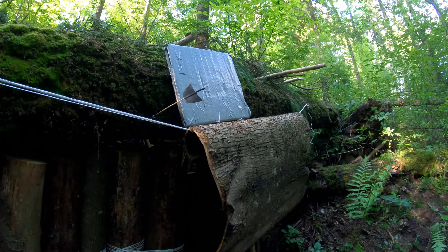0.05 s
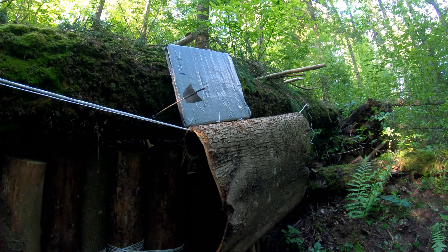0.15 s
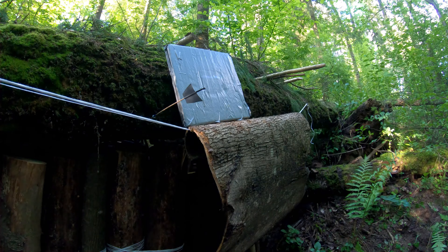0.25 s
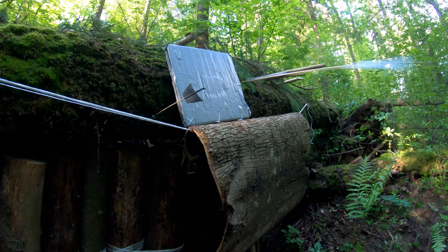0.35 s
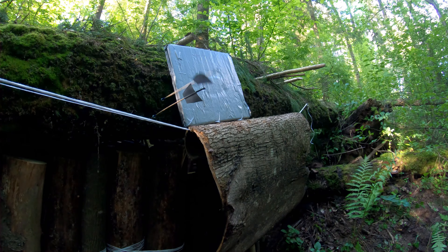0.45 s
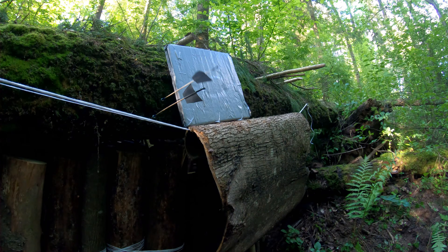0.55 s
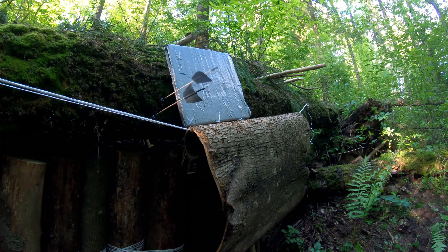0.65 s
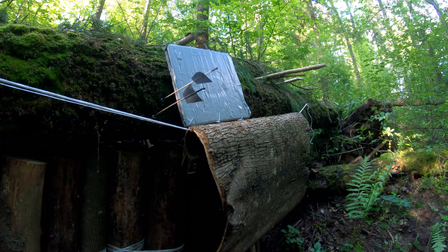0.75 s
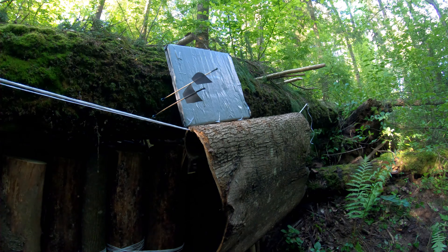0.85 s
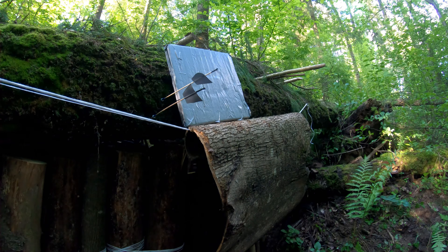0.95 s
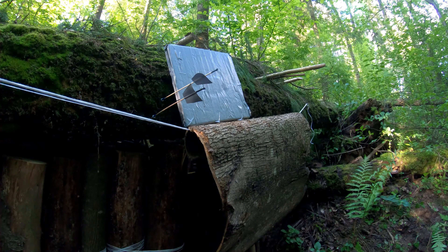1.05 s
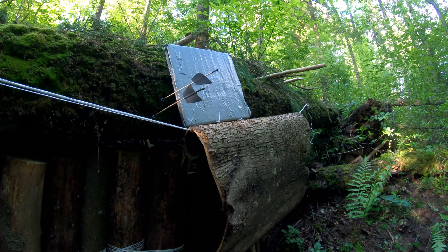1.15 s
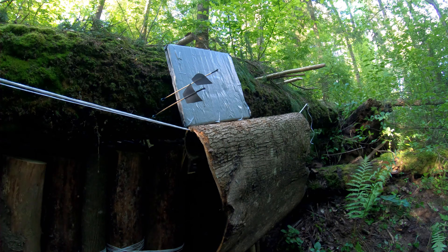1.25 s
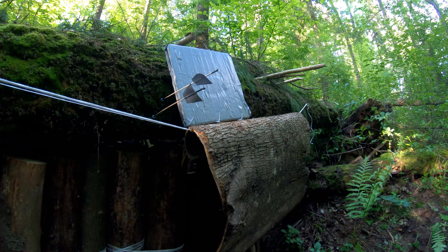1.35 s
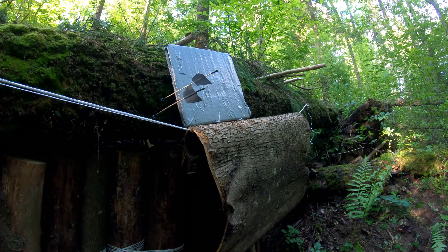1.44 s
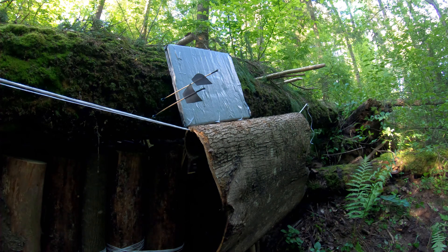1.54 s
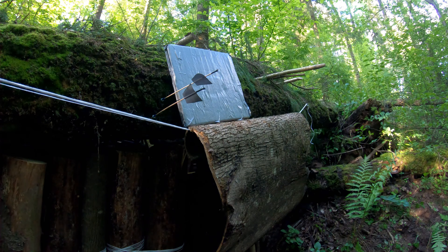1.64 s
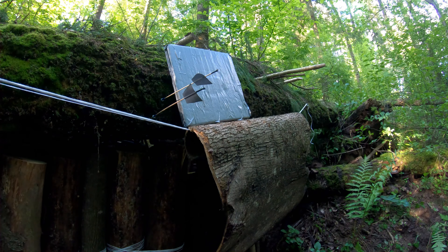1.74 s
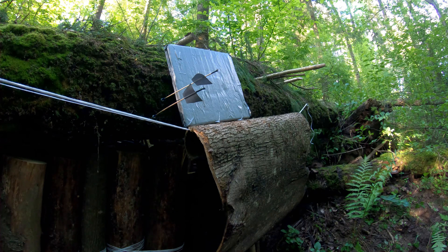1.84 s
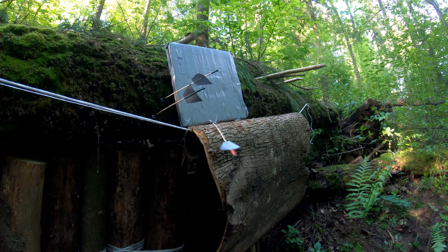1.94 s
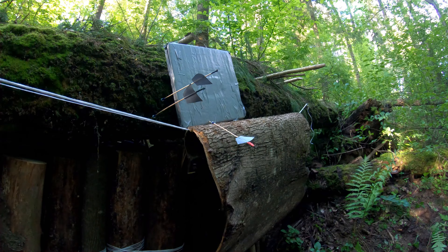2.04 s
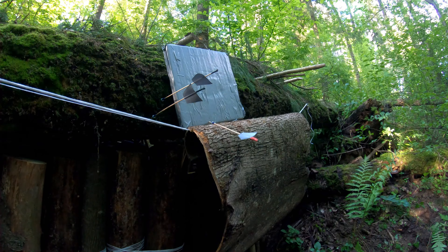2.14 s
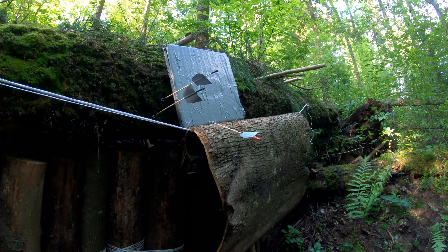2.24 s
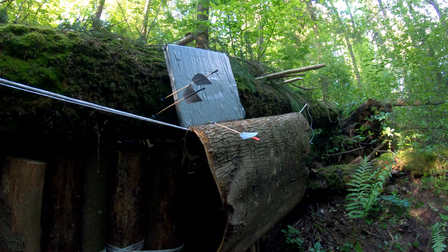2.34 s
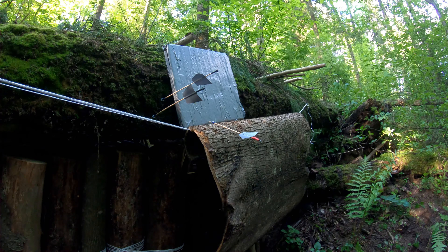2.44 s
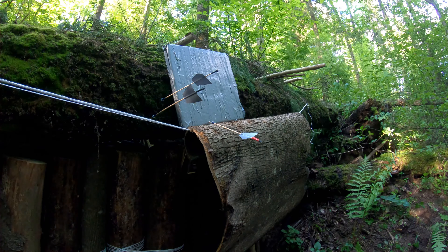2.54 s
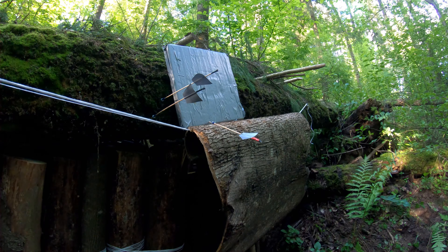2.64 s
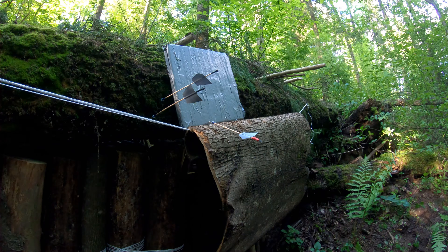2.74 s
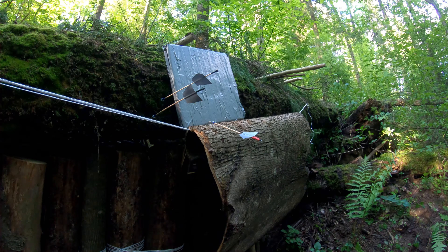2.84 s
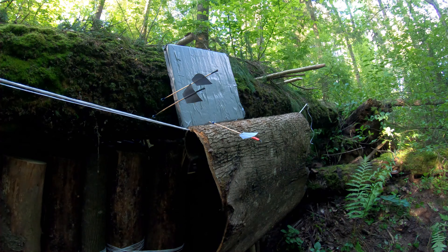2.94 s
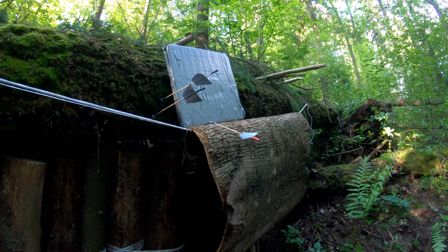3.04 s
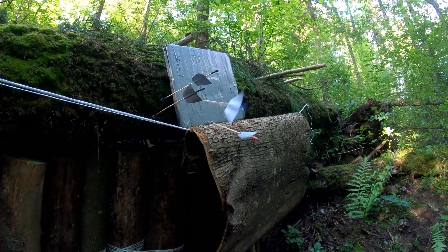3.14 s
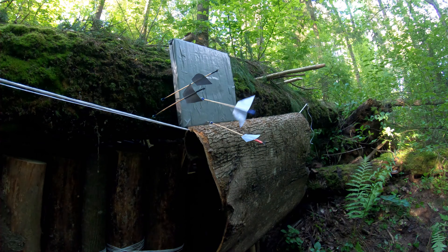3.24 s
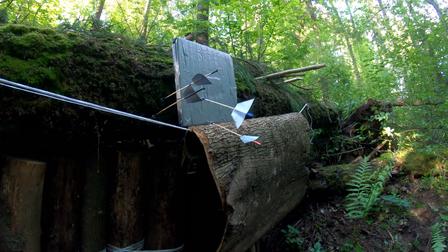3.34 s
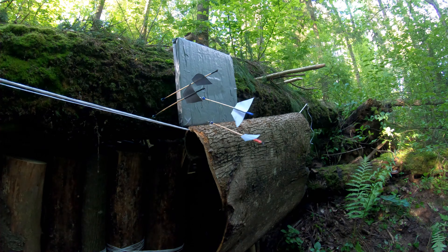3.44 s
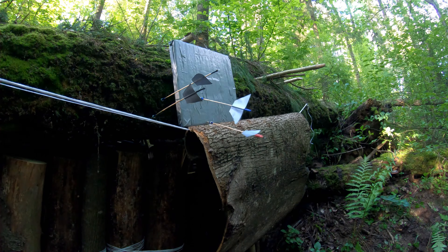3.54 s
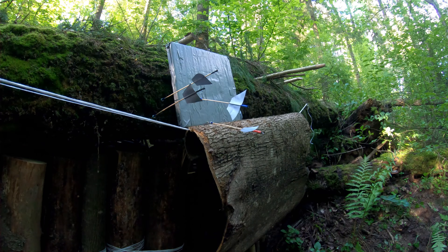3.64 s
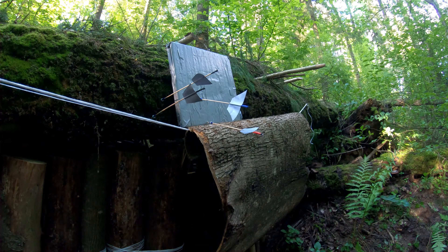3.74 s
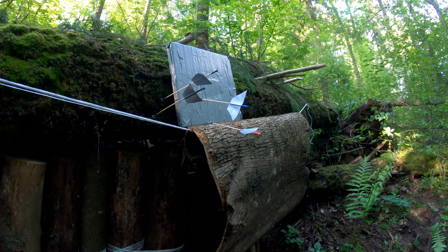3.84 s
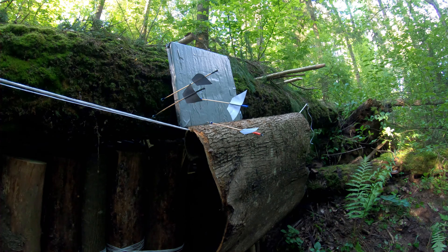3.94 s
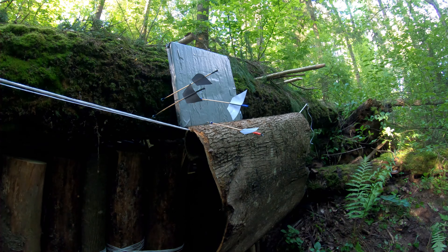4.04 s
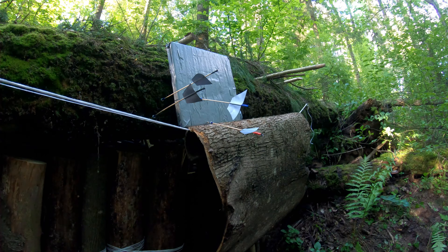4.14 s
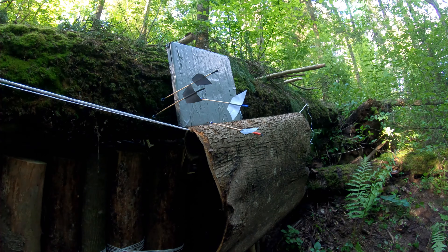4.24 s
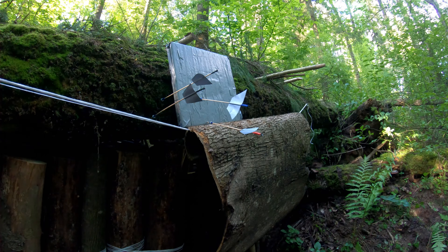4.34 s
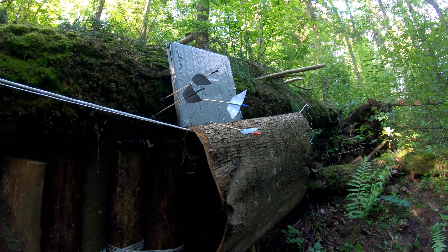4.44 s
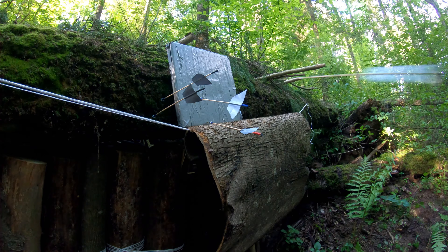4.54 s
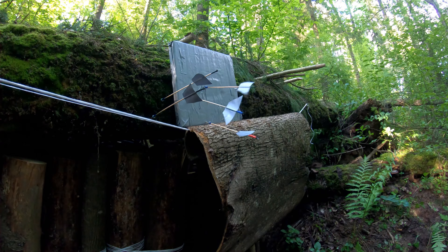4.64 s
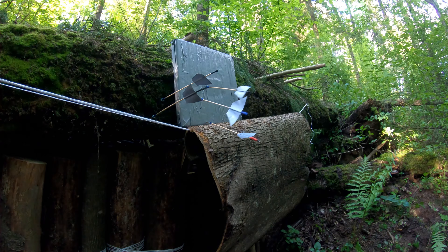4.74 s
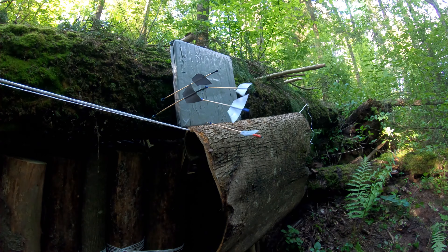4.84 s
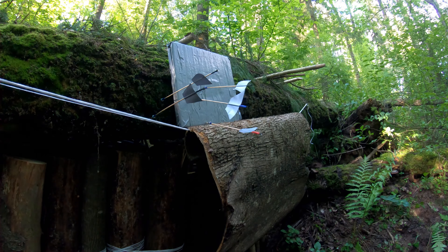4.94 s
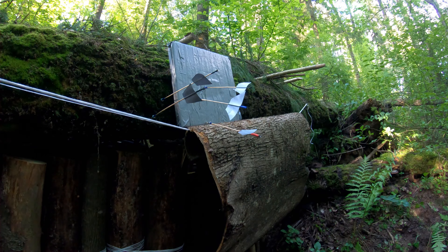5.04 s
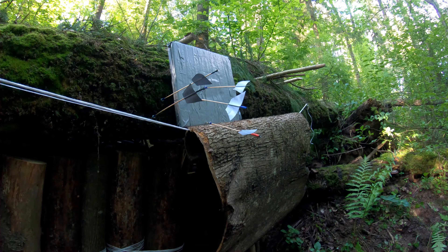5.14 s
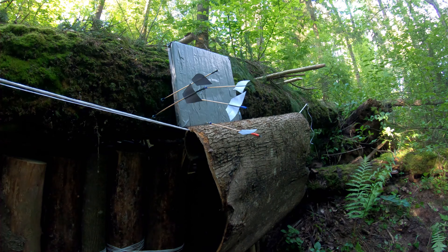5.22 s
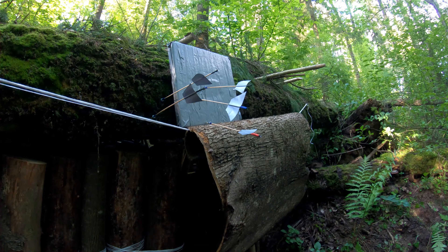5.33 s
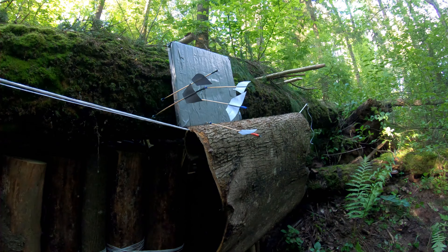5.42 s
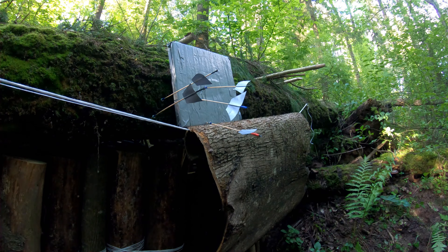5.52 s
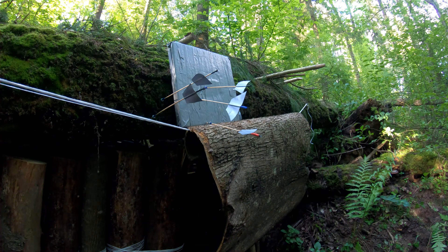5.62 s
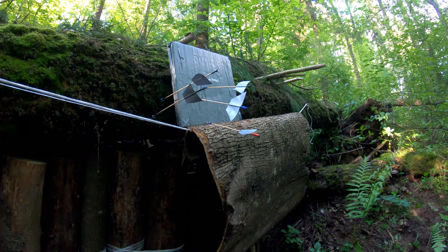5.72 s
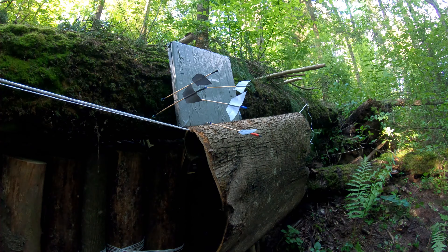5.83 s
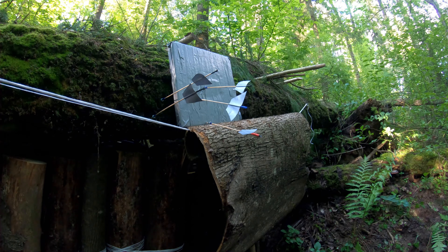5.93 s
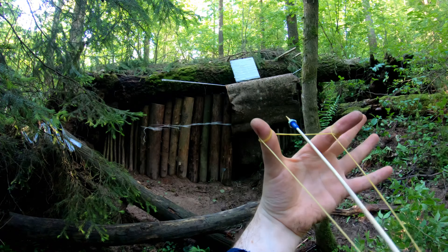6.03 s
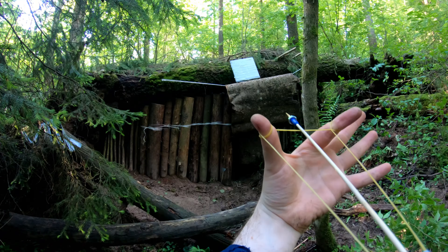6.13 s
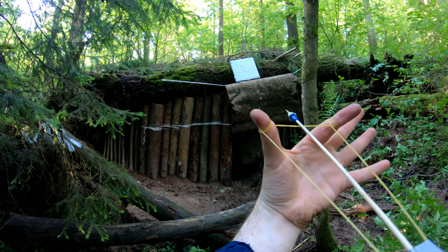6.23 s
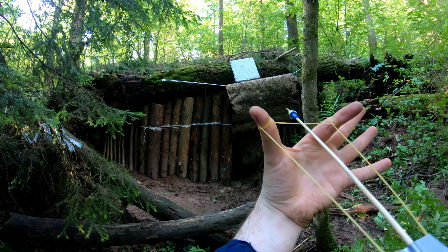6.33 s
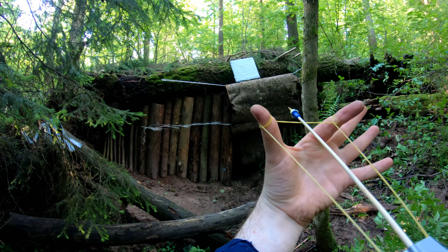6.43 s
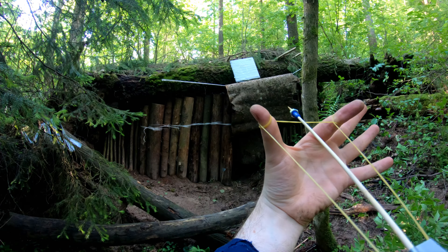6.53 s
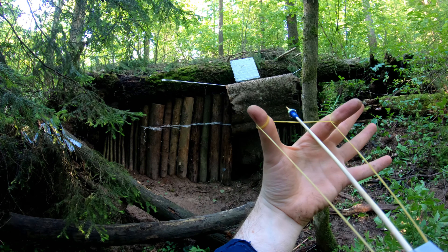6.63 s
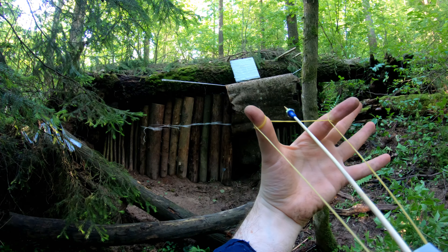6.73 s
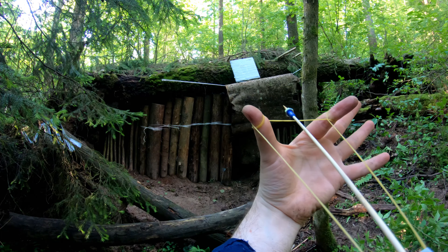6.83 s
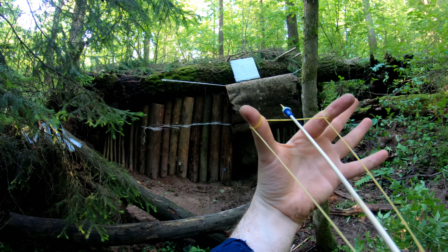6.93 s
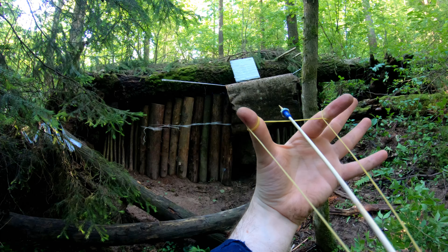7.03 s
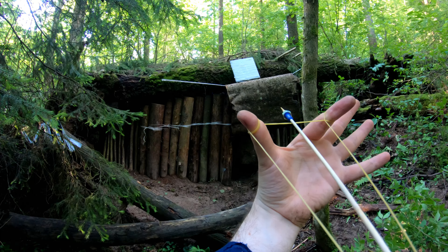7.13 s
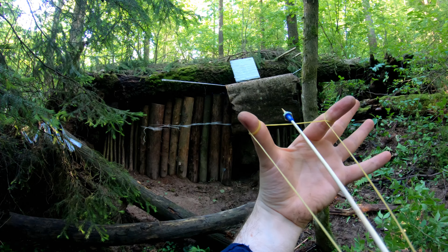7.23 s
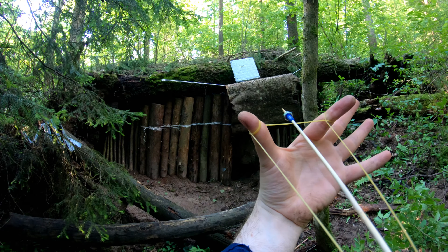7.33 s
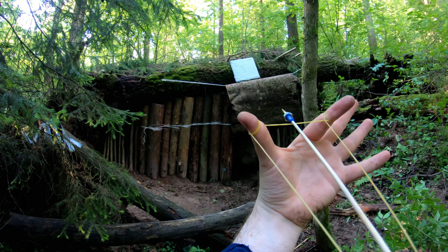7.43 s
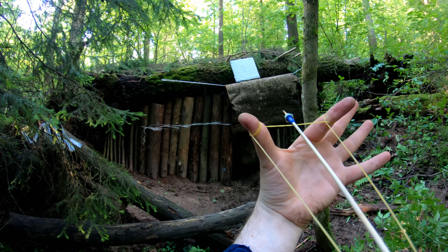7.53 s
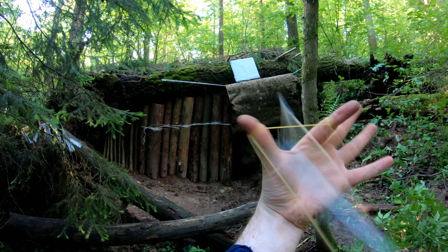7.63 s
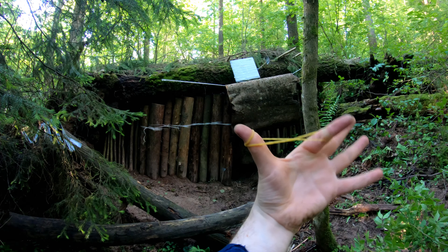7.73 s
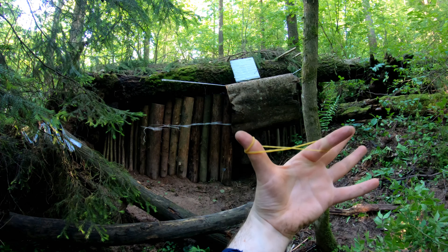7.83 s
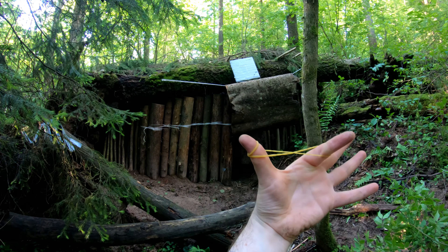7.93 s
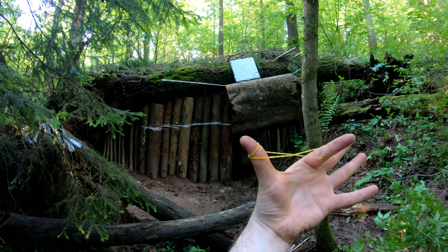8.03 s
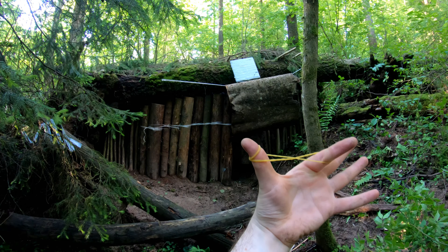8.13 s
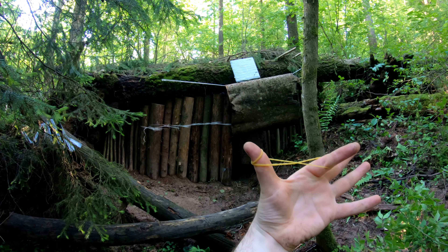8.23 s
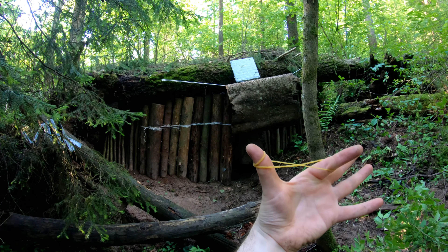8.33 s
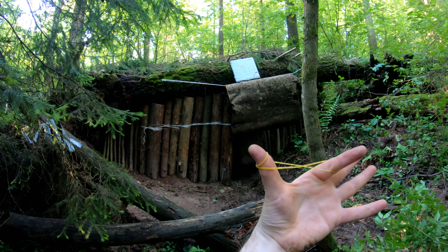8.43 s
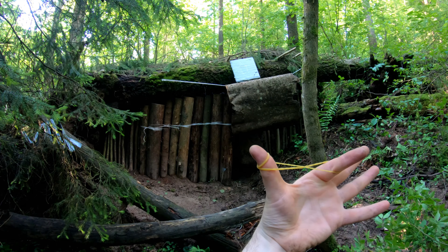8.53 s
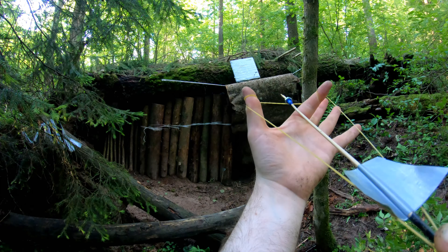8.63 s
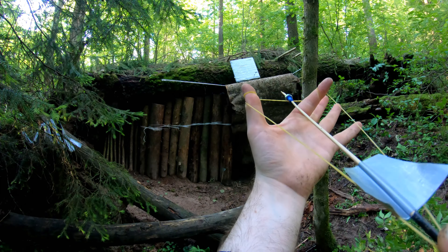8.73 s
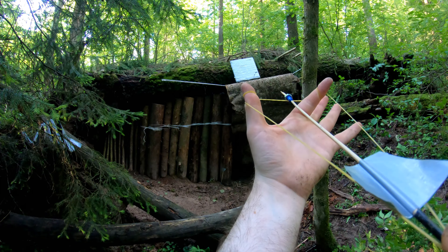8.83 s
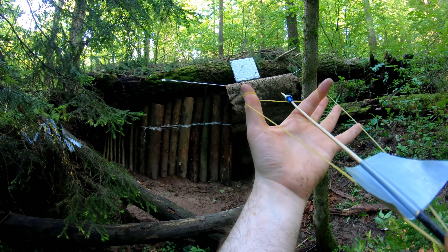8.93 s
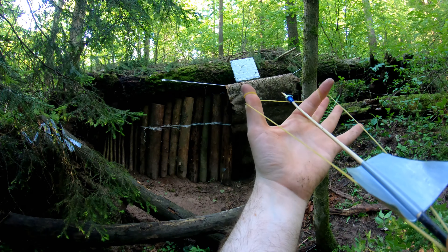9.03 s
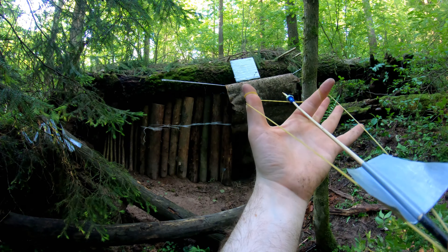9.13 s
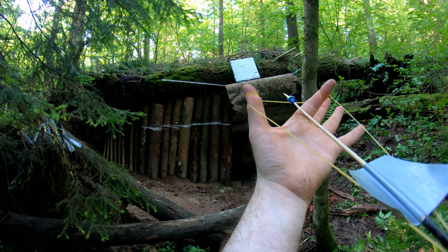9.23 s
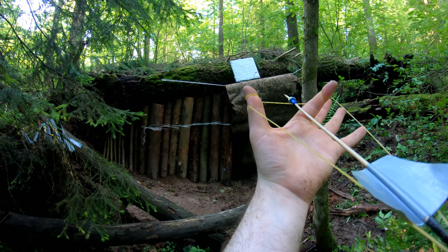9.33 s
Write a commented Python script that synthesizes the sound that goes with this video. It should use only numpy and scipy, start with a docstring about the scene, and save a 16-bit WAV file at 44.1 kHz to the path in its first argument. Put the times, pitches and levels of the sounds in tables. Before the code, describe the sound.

Rubber-band darts snap and crack into a board propped on a log shelter, woody thuds echoing briefly through a quiet forest.

```python
"""Dart shots in a wood

Rubber-band darts are shot at a board propped on a log shelter. The band snaps (short coloured noise), a short
noise band swells just ahead of each strike, the tip cracks in (click and noise) and the wood thuds (dying tones).
The trees send back a short wash of fading noise. Under it lie a low rumble, a steady hush, a lingering hiss,
small ticks and faint far birds, all made from filtered noise."""
import sys
import numpy as np
from scipy import signal
from scipy.fft import rfft, irfft
from scipy.io import wavfile

SR = 44100
rng = np.random.default_rng(int(sys.argv[2]) if len(sys.argv) > 2 else 0)


def wav_record(signal):
    """Record a signal, one row per channel, as 16-bit PCM in the file named by sys.argv[1]."""
    frames = np.transpose(np.atleast_2d(signal))
    bounded = np.clip(frames, -1, 1)
    # unit amplitude maps onto the largest positive 16-bit level
    quanta = np.round(bounded * 32767).astype(np.int16)
    wavfile.write(sys.argv[1], SR, quanta)


N = 413216
T = np.arange(N) / SR

# dart strikes: start_s, crack_db, six thud gains_db (one per pitch in THUD_GROUPS_HZ), ring_length (factor),
# crack_tilt_db_per_octave, housing_ring_db, top_treble_db, shudder_db, wash_db (share sent to the trees),
# wash_housing_ring_db, wash_tilt_db_per_octave; all levels are gains
STRIKES = [(0.5194, -33.5, -79, -81.5, -29, -14.5, -36, -32, .42, 1.5, -7.5, 10.5, -8.5, -31, -8, 6),
           (2.0368, -18, -30, -39.5, -21, -28.5, -26, -24, 0.58, 5.5, -6.5, 9.5, -8, -21, -8, 4.5),
           (3.2662, -3, -16, -29, -28.5, -26.5, -24, -34, 0.48, 4.5, 1.5, -9.5, -20.5, -29, -3.5, 7),
           (4.695, -7.5, -36.5, -24.5, -29, -25, -22.5, -19.5, .5, 3, 3.5, -3.5, -14.5, -23, -2.5, 6.5),
           (7.984, -9.5, -51, -23, -28.5, -22.5, -25.5, -41.5, 0.4, -1.5, 6, 2.5, -18, -20, -10, 0.5)]
# pitches at which the six thud gains of a strike hold: pitch_hz
THUD_GROUPS_HZ = [65, 150, 210, 330, 600, 1200]


def from_db(db):
    """Turn decibels into a plain gain: 20 dB is ten times the amplitude."""
    return 10 ** (np.asarray(db) / 20)


def rms_one(x):
    """Scale a sound to an average strength (rms) of 1."""
    return x / np.sqrt(np.mean(x ** 2) + 1e-20)


def at_hz(points, hz):
    """Read a table of (pitch, value) between its points, with equal steps per octave."""
    pitch_hz, values = np.array(points).T
    return np.interp(np.log(np.maximum(hz, 1)), np.log(pitch_hz), values)


def coloured(x, spectrum, size=4096):
    """Filter to a (Hz, dB) colour with no sound ahead of its cause (minimum phase); total energy gain is 1."""
    log_gain = at_hz(spectrum, np.fft.rfftfreq(size, 1 / SR)) * np.log(10) / 20
    cepstrum = irfft(log_gain)
    # folding the second half onto the first puts the energy as early as possible
    cepstrum[1:size // 2] *= 2
    cepstrum[size // 2 + 1:] = 0
    response = irfft(np.exp(rfft(cepstrum)))
    return signal.oaconvolve(x, response / np.sqrt(np.sum(response ** 2)))[:len(x)]


def drift(points_per_s):
    """Slow random wandering: normal random points joined by straight lines."""
    steps = np.arange(int(N / SR * points_per_s) + 2)
    return np.interp(T * points_per_s, steps, rng.standard_normal(len(steps)))


def resonance(x, hz, width_hz):
    """Ring at one pitch (two-pole resonance) with a gain of about 1 at the peak."""
    r = np.exp(-np.pi * width_hz / SR)
    feedback = [1, -2 * r * np.cos(2 * np.pi * hz / SR), r * r]
    return signal.lfilter([(1 - r * r) / 2, 0, -(1 - r * r) / 2], feedback, x)


def dying(t, rise_ms, fall_ms):
    """Loudness shape that rises and then dies away exponentially."""
    rise = 1 - np.exp(-1000 * t / max(rise_ms, .01))
    return rise * np.exp(-1000 * t / fall_ms)


def grainy(lumps_db, size):
    """Noise in uneven lumps, as from many tiny knocks."""
    grain_ms = 0.8
    steps = np.arange(size) / (grain_ms * SR / 1000)
    lumps = np.interp(steps, np.arange(size), rng.standard_normal(size))
    return rms_one(from_db(lumps_db * lumps) * rng.standard_normal(size))


def tilted(spectrum, db_per_octave, ring_db, air_db=0):
    """Tilt a colour about 3 kHz, with a hump where the microphone housing rings and a step at the very top."""
    ring_hz, ring_octaves, air_edge_hz = 4442, .25, 11600
    hz = np.geomspace(400, 16000, 90)
    tilt = db_per_octave * np.log2(hz / 3000)
    hump = ring_db * np.exp(-(np.log2(hz / ring_hz) / ring_octaves) ** 2)
    step = air_db / (1 + (air_edge_hz / hz) ** 20)
    return np.transpose([hz, at_hz(spectrum, hz) + tilt + hump + step])


def add(out, s, sound):
    """Mix a sound in at time s."""
    at = round(s * SR)
    out[at:at + len(sound)] += sound


def rumble():
    """Lumpy low noise in three pitch ranges, which swell independently; the deepest swells strongly once."""
    # colour of the rumble: pitch_hz, relative_db
    rumble_colour = [(15, -39), (25, -5.5), (65, -10), (119, -21.5), (141, -7.5), (167, -3.5), (302, -11),
                     (450, -22.5), (580, -49.5), (990, -120)]
    # base level of the middle and upper parts over time: time_s, middle_db, upper_db
    rumble_levels = [(0, -73.5, -75.5), (0.451, -69, -75.5), (1.2, -70.5, -77.5), (2.139, -72.5, -70),
                     (2.501, -72.5, -79.5), (2.88, -73, -75.5), (3.2, -63.5, -62.5), (3.81, -69.5, -80),
                     (4.3, -67, -76), (4.4, -64.5, -68), (4.66, -58, -60.5), (5.15, -68, -73),
                     (5.4, -73, -65), (5.9, -68, -71), (6.599, -70, -78), (7.3, -70, -73),
                     (8.0, -67.5, -74), (8.59, -73.5, -72), (9.37, -64.5, -73)]
    low_hz, high_hz = 110, 220
    deep_db, puff_s, puff_width_s, puff_db = -75.5, 5.8, 0.076, 19
    s, middle_db, upper_db = np.transpose(rumble_levels)
    puff = puff_db * np.exp(-((T - puff_s) / puff_width_s) ** 2)
    levels = [deep_db + puff, np.interp(T, s, middle_db), np.interp(T, s, upper_db)]
    bands = [(low_hz, "low"), ([low_hz, high_hz], "band"), (high_hz, "high")]
    noise = coloured(rng.standard_normal(N), rumble_colour)
    out = np.zeros(N)
    for level_db, band in zip(levels, bands):
        part = signal.sosfiltfilt(signal.butter(2, *band, fs=SR, output="sos"), noise)
        out += from_db(level_db + 2.4 * drift(9)) * rms_one(part)
    return out


def hush():
    """A broad, nearly steady hush: coloured noise that wavers slightly."""
    # colour of the hush: pitch_hz, relative_db
    hush_colour = [(240, -28.5), (400, -6.5), (519, -7), (623, -2.5), (847, 0), (1070, -11.5), (1220, -9),
                   (2090, -20), (4490, -31), (5730, -24.5), (7100, -27), (10500, -30), (12500, -27),
                   (15500, -30)]
    return from_db(-77 + 0.37 * drift(5.5)) * coloured(rng.standard_normal(N), hush_colour)


def lingering_hiss():
    """Flickering noise near 4.5 kHz that comes up around or after most strikes and stops abruptly."""
    # colour of the hiss: pitch_hz, relative_db
    hiss_colour = [(2600, -41.5), (3400, -15.5), (4000, 1), (4500, 2), (5100, -5), (6000, -20),
                   (8000, -44.5)]
    # stretches of hiss: start_s, end_s, added_gain_db, change_by_end_db
    hiss_stretches = [(0.595, 1.46, -97, 1), (2.1, 2.907, -93, 3.5), (3.307, 4.333, -85.5, -16.5),
                      (4.698, 6.017, -81.5, 0)]
    floor_db, rise_s, stop_s = -92.5, .2, 0.012
    gain = from_db(floor_db)
    for start, end, db, change_db in hiss_stretches:
        times = [start, start + rise_s, end, end + stop_s]
        gain = gain + np.interp(T, times, [0, from_db(db), from_db(db + change_db), 0])
    return gain * from_db(0.91 * drift(12)) * coloured(rng.standard_normal(N), hiss_colour)


def blurred_tone(out, start, rise, fall, hz, width_hz, level_db):
    """Mix in a narrow noise band that swells, sinks to a quarter and stops."""
    t = np.arange(round((rise + fall) * SR)) / SR
    swell = np.interp(t, [0, rise, rise + fall], [0, 1, .25])
    white = rng.standard_normal(len(t))
    band = resonance(resonance(white, hz, width_hz), hz, width_hz)
    add(out, start, from_db(level_db) * swell * rms_one(band))


def birds():
    """Far bird whistles, blurred into noise bands by distance."""
    # one bird repeats a short call: start_s, level_db (before the swell)
    repeated_calls = [(0.252, -80.5), (1.748, -81.5), (2.742, -89.5), (6.248, -82), (7.548, -81)]
    # other birds smeared by the wood: start_s, rise_s, fall_s, pitch_hz, width_hz, level_db (before the swell)
    other_birds = [(.6, .14, 0.68, 4980, 700, -92.5), (0.81, .05, 0.6, 4190, 70, -85.5),
                   (1.1, 0.11, 0.14, 4280, 110, -84), (1.17, .16, 0.14, 3470, 800, -80.5),
                   (5.299, 0.2, 0.68, 3270, 604, -86), (8.718, 0.046, 0.26, 3740, 200.1, -82.5),
                   (8.779, 0.062, 0.31, 4410, 510, -74), (8.9, 0.33, 0.16, 3054, 90.8, -88.5),
                   (8.45, 0.14, 0.1, 8220, 200, -89.5)]
    out = np.zeros(N + SR)  # room for a call that runs past the end
    for start, level_db in repeated_calls:
        blurred_tone(out, start, rise=.16, fall=.13, hz=3740, width_hz=490, level_db=level_db)
    for bird in other_birds:
        blurred_tone(out, *bird)
    return out[:N]


def hanging_tones():
    """Thin tones that hang on after a strike, made as narrow noise bands."""
    # the tones: start_s, length_s, pitch_hz, width_hz, level_db (before the swell)
    hanging = [(4.718, 1, 7310, 39.2, -93), (8.1, .55, 1905, 119, -82.5), (8.1, 0.79, 1220, 117, -85),
               (8.1, 0.92, 786, 119.5, -75)]
    out, rise_s = np.zeros(N + SR), 0.11
    for start, length, hz, width_hz, level_db in hanging:
        blurred_tone(out, start, rise_s, length - rise_s, hz, width_hz, level_db)
    return out[:N]


def hiss_before_strikes():
    """A short band of hiss that swells just ahead of each strike and stops at it."""
    # hiss, one row per strike: level_db (before the swell), pitch_hz, width_hz
    swelling_hiss = [(-57.5, 5000, 1400), (-33, 4800, 3400), (-32.5, 4600, 1800), (-30.5, 5550, 990),
                     (-42.5, 1000, 2400)]
    out, t = np.zeros(N), np.arange(SR // 10) / SR
    for (s, *_), (level_db, hz, width_hz) in zip(STRIKES, swelling_hiss):
        hiss = rng.standard_normal(len(t))
        for _ in range(3):
            hiss = resonance(hiss, hz, width_hz)
        swell = dying(t, rise_ms=0, fall_ms=8)[::-1]  # a dying shape played backwards
        add(out, s - t[-1], from_db(level_db) * swell * rms_one(hiss))
    return out


def snaps():
    """Rubber slapping the fingers and twigs ticking: a bright burst and rustle over a dull thump."""
    # slaps of the released band: start_s, burst_gain_db, thump_gain_db, fall_ms, tilt_db_per_octave, housing_ring_db
    band_slaps = [(0.392, -57.5, -69, 5, 5, 5.5), (.418, -52, -59.5, 4.0, 7, 5),
                  (1.933, -62.5, -65, 6.6, 7, 4), (1.956, -60, -59.5, 4.8, 6.5, 10.5),
                  (3.165, -55.5, -64, 9.4, 4.5, 2), (3.178, -49, -57, 6.6, 4.5, 4.5),
                  (3.185, -45, -50, 4.5, -3.5, 7.5), (4.577, -67.5, -60, 6.0, 3, 9.5),
                  (4.59, -63.5, -56, 6.0, 1.5, 9), (7.73, -47, -48.5, 1.68, 0, 3.5),
                  (7.7442, -34.5, -43.5, 1.1, 3.5, 7), (7.7679, -23.5, -45.5, 0.62, 0, -2)]
    # small ticks in the undergrowth: start_s, burst_gain_db, tilt_db_per_octave
    twig_ticks = [(3.54, -65, -7.5), (3.7204, -66, -8), (6.218, -67.5, -1), (6.24, -69.5, -1),
                  (6.454, -69, -1), (6.621, -72, 5.5), (7.908, -57.5, 2)]
    # colour of the bright burst: pitch_hz, relative_db
    snap_colour = [(470, -41), (800, -3.5), (1160, -6), (1580, 0), (2630, 2), (5470, -13), (7740, -20),
                   (9440, -46), (12700, -25), (15500, -32)]
    rustle_db, rustle_ms = -14, 12
    out, t = np.zeros(N), np.arange(SR // 8) / SR
    # a tick's thump is 2.5 dB over its burst; it falls in 2.8 ms and has a housing ring of -3 dB
    ticks = [(s, db, db + 2.5, 2.8, tilt_db, -3) for s, db, tilt_db in twig_ticks]
    for s, burst_db, thump_db, fall_ms, tilt_db, ring_db in band_slaps + ticks:
        bright, dull = grainy(lumps_db=1.5, size=len(t)), rng.standard_normal(len(t))
        shape = dying(t, .3 * fall_ms, fall_ms)
        shape += from_db(rustle_db) * dying(t, fall_ms, rustle_ms)
        burst = rms_one(shape * bright) * np.sqrt(np.mean(shape ** 2))  # same energy as its shape
        add(out, s, from_db(burst_db) * coloured(burst, tilted(snap_colour, tilt_db, ring_db)))
        thump = rms_one(resonance(resonance(dull, 230, 350), 280, 350))
        add(out, s, from_db(thump_db) * dying(t, 2.5, 10.5) * thump)
    return out


def trees(x):
    """Scatter from many trunks: noise that builds, then dies at its own pace in each half-octave band."""
    # time for the wash to fall by 60 dB: pitch_hz, fall_s
    wash_fall = [(100, 0.38), (300, 0.53), (700, 0.36), (1500, 0.33), (3000, 0.31), (4500, 0.45),
                 (7000, .3), (9000, 0.22), (13000, 0.35)]
    t, edges, rise_s = np.arange(SR) / SR, 60 * 2 ** np.arange(0, 8.1, .5), 0.004
    response = np.zeros(SR)
    for low, high in zip(edges, edges[1:]):
        band_filter = signal.butter(2, [low, high], "band", fs=SR, output="sos")
        band = signal.sosfilt(band_filter, rng.standard_normal(SR))
        response += band * from_db(-60 * t / at_hz(wash_fall, np.sqrt(low * high)))
    response *= 1 - np.exp(-t / rise_s)
    return signal.oaconvolve(x, response / np.sqrt(np.sum(response ** 2)))[:N]


def contacts():
    """Every strike, then every rebound as a weaker copy of the strike before it."""
    # the dart slaps or the board rocks back:
    # start_s, crack_loss_db, thud_loss_db, thud_brightening_db_per_octave
    rebounds = [(2.0481, 8.5, 9, 1), (2.0696, 23, 16.5, -3.5), (3.356, 48, 29.5, 4)]
    rows = [list(strike) for strike in STRIKES]
    octaves = np.log2(np.array(THUD_GROUPS_HZ) / THUD_GROUPS_HZ[3])
    for s, crack_loss_db, thud_loss_db, brighter_db in rebounds:
        _, crack_db, *rest = [strike for strike in STRIKES if strike[0] < s][-1]
        groups = np.array(rest[:6]) - thud_loss_db + brighter_db * octaves
        rows.append([s, crack_db - crack_loss_db, *groups, *rest[6:]])
    return rows


def ringing(t, groups, length):
    """The board's tones, weighted by where the dart lands; they fade slowly at first, then ever faster."""
    # tones of board and logs: pitch_hz, relative_db, ring_s (scaled by the strike's ring length)
    board_tones = [(62.7, -8.5, .12), (155.5, 5, 0.13), (203.94, 4, 0.21), (266.5, -11.5, 0.23),
                   (323.6, 3.5, 0.086), (411, -2.5, .08), (510, 0.5, 0.12), (563, -1.5, 0.058),
                   (709.6, 1, 0.075), (1000, -1, .05), (1203, -9.5, 0.059), (1600, -8, 0.033),
                   (1960, -10, 0.03)]
    out, rise_ms = np.zeros(len(t)), 1.6
    weights = list(zip(THUD_GROUPS_HZ, groups))
    for hz, level_db, ring_s in board_tones:
        level = from_db(level_db + 5.5 + at_hz(weights, hz))
        age = t / (ring_s * length)
        fade = from_db(-25 * age - 49 * age ** 2) * (1 - np.exp(-1000 * t / rise_ms))
        tone = fade * np.cos(2 * np.pi * hz * t)
        # a small free plate radiates little below its own pitch
        out -= level * signal.sosfilt(signal.butter(1, hz / 2, "high", fs=SR, output="sos"), tone)
    return out


def rattle(t):
    """The board rattling on the logs: lumpy noise through a broad resonance, quickly dying."""
    knocks = grainy(lumps_db=6, size=len(t))
    for _ in range(2):
        knocks = resonance(knocks, hz=700, width_hz=570)
    return rms_one(knocks) * dying(t, rise_ms=0.77, fall_ms=19)


def darts():
    """The tip cracks in and the shaft shudders; a moment later the board rings and rattles on the logs."""
    # colour of the crack: pitch_hz, relative_db
    crack_colour = [(590, -33.5), (1000, -7), (1480, -1.5), (3370, -10.5), (4150, -2.5), (4390, -1),
                    (5150, -11.5), (6340, -17), (6710, -23), (8440, -35), (10700, -70.5), (12600, -47.5),
                    (15500, -57)]
    thud_lag_s, rattle_db = 0.0012, -7.5
    wash_click_db, wash_thud_db, wash_air_db = 15.5, -4.5, 3.5
    direct, to_trees, t = np.zeros(N), np.zeros(N), np.arange(SR // 4) / SR
    for s, crack_db, *groups, length, tilt_db, ring_db, air_db, shudder_db, wash_db, wash_ring_db, wash_tilt_db \
            in contacts():
        burst = from_db(-3.5) * dying(t, 0, 0.8) * rng.standard_normal(len(t))
        burst[0] = from_db(6)  # first touch of the tip
        burst += from_db(shudder_db) * dying(t, 0, 11) * grainy(lumps_db=4, size=len(t))
        crack = from_db(crack_db) * coloured(burst, tilted(crack_colour, tilt_db, ring_db, air_db))
        # the rattle follows the thud gain near 600 Hz
        thud = ringing(t, groups, length) + from_db(rattle_db + groups[4]) * rattle(t)
        add(direct, s, crack)
        add(direct, s + thud_lag_s, thud)
        # the trees get a single coloured click in place of the crack
        click_colour = tilted(crack_colour, wash_tilt_db, wash_ring_db, air_db + wash_air_db)
        click = from_db(crack_db + wash_click_db) * coloured(1. * (t == 0), click_colour)
        add(to_trees, s, from_db(wash_db) * (click + from_db(wash_thud_db) * thud))
    return direct, to_trees


def scene():
    """Shots with their wash, over the wood."""
    background = rumble() + hush() + lingering_hiss() + birds() + hanging_tones()
    release = snaps()
    strikes, strikes_to_trees = darts()
    wash = trees(strikes_to_trees + from_db(-13.5) * release)
    return (background + wash + hiss_before_strikes() + release + strikes)[None]


def record(dry):
    """The microphone drops the deepest bass, below 40 Hz; the top is cut near 16 kHz."""
    thinned = signal.sosfilt(signal.butter(2, 40, "high", fs=SR, output="sos"), dry)
    return signal.sosfilt(signal.cheby2(20, 50, 15950, fs=SR, output="sos"), thinned)


dry = scene()
out = record(dry)
wav_record(out)
```